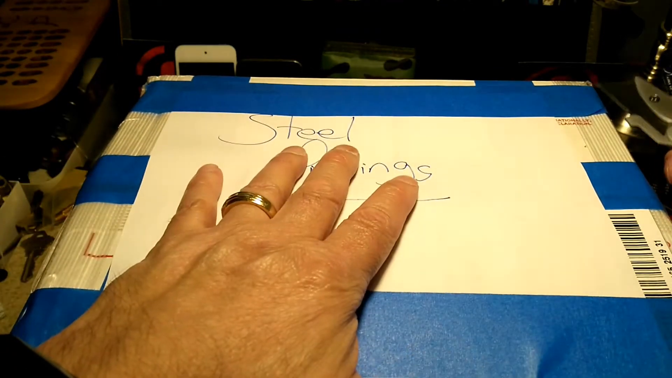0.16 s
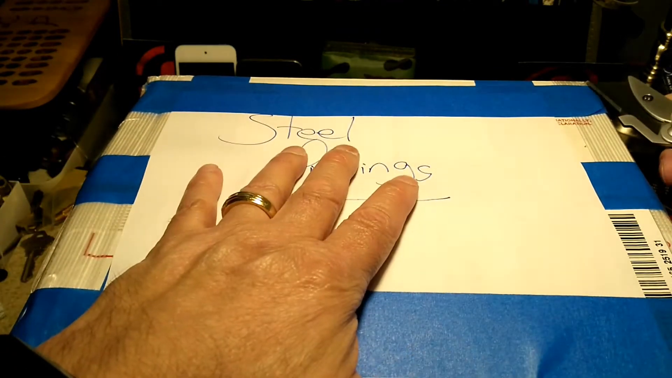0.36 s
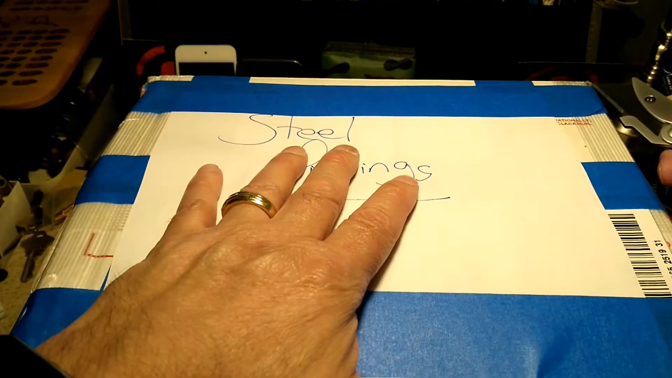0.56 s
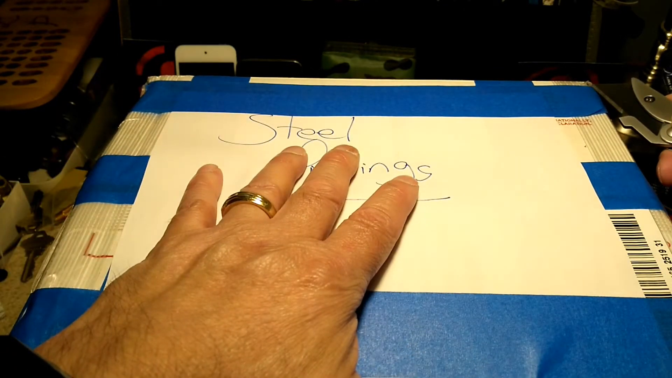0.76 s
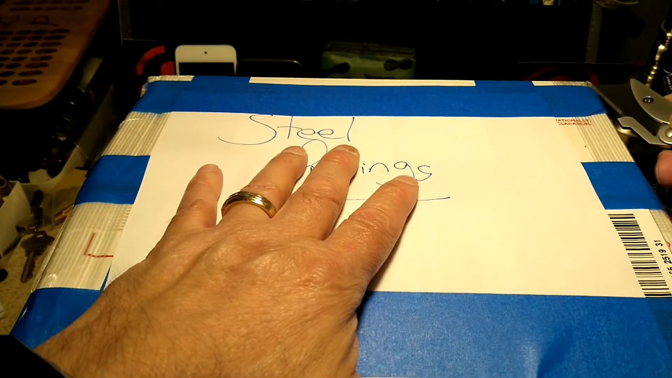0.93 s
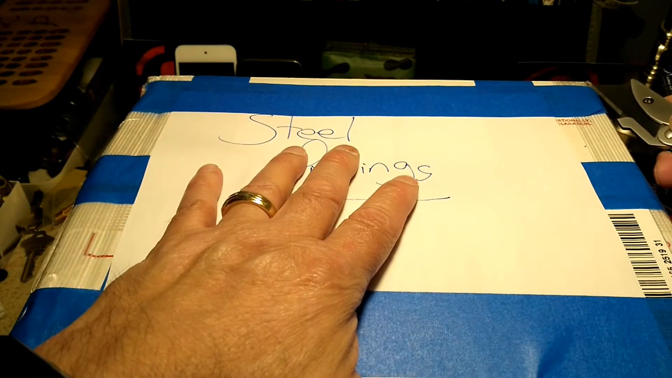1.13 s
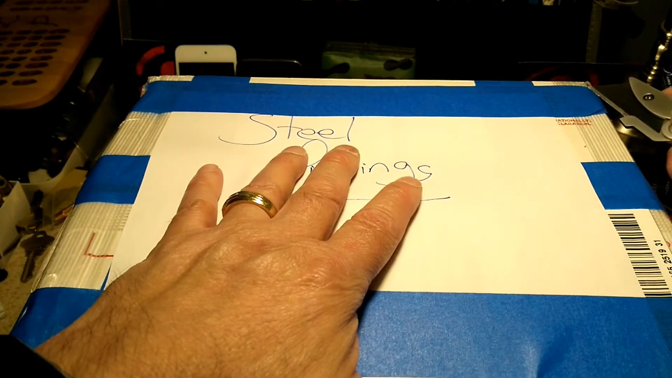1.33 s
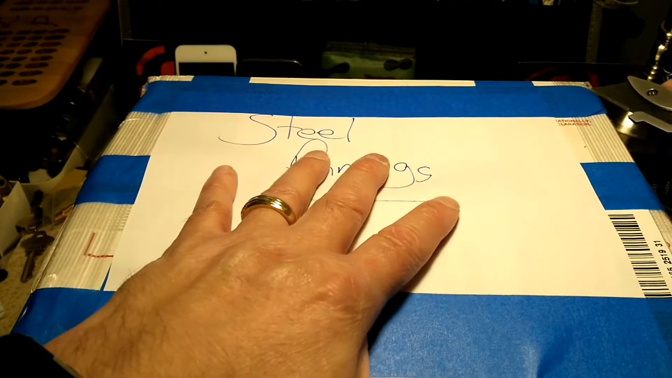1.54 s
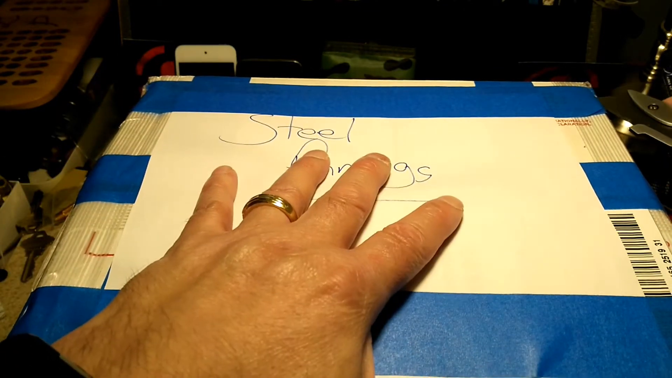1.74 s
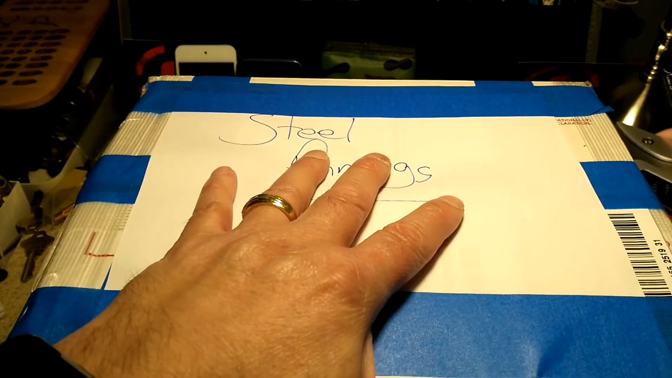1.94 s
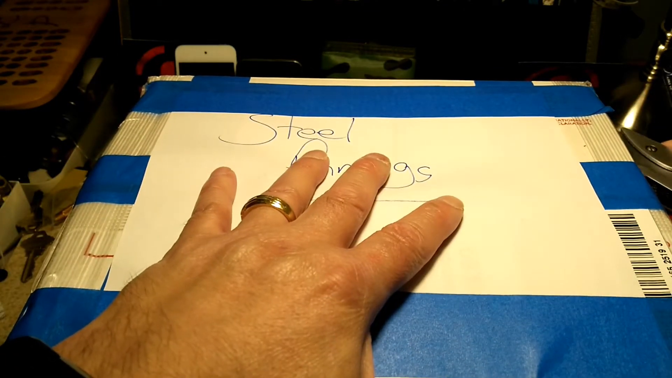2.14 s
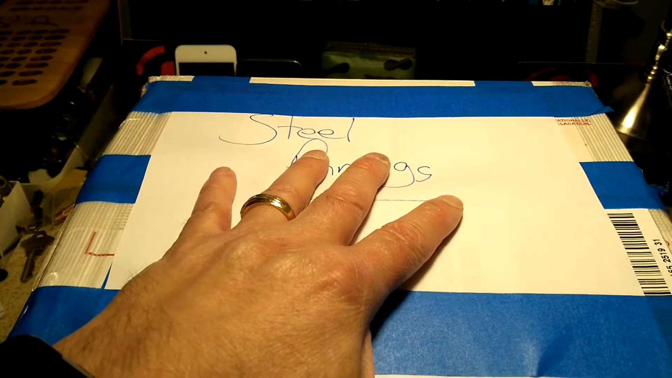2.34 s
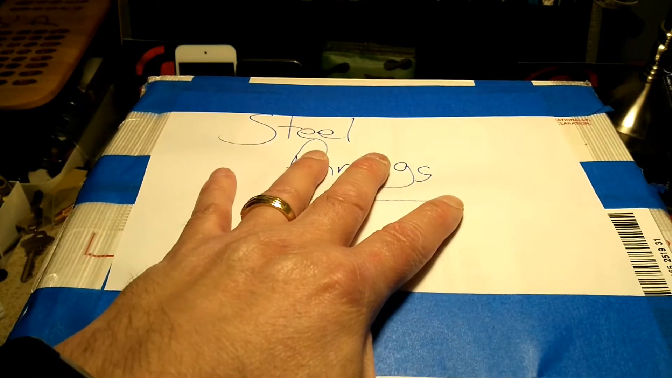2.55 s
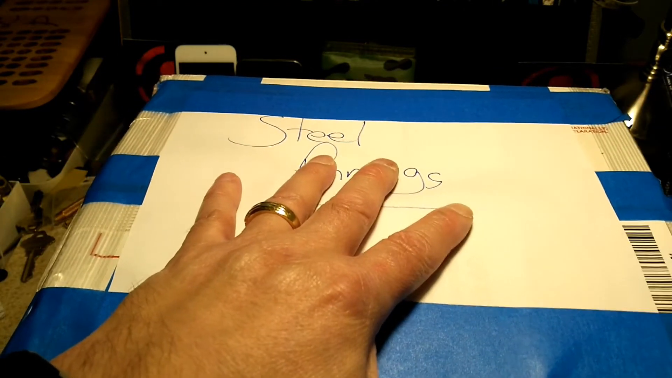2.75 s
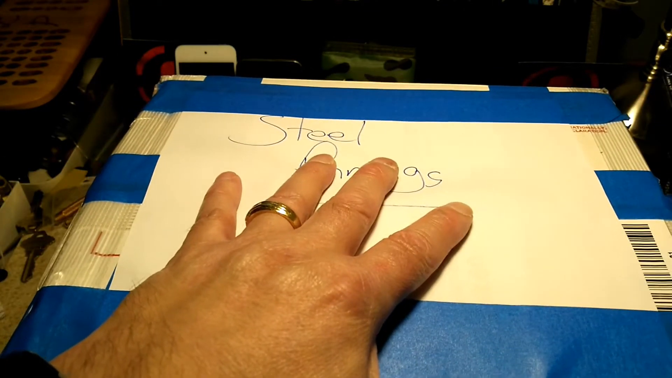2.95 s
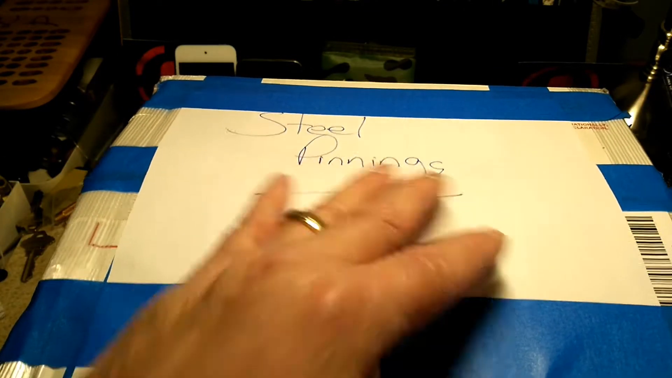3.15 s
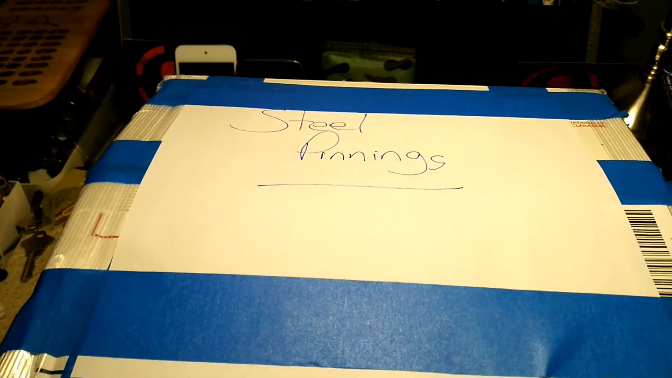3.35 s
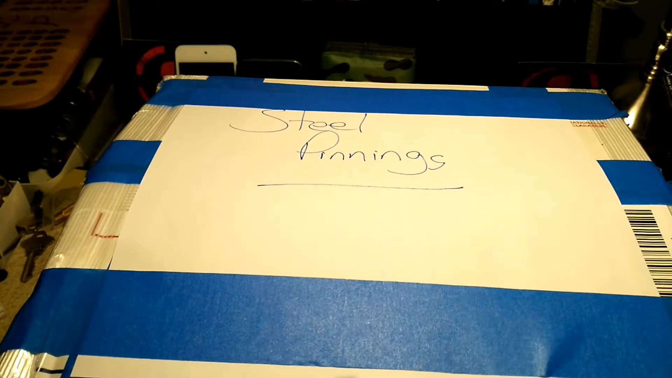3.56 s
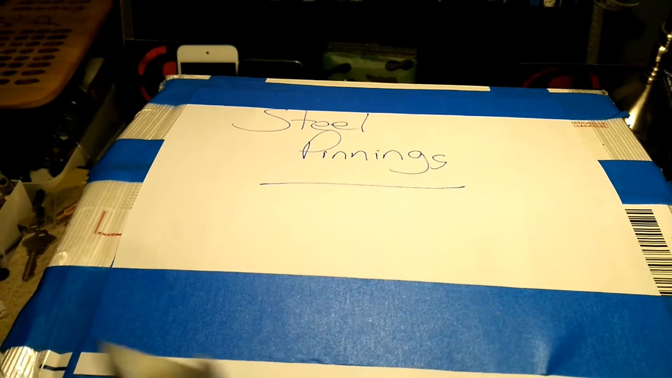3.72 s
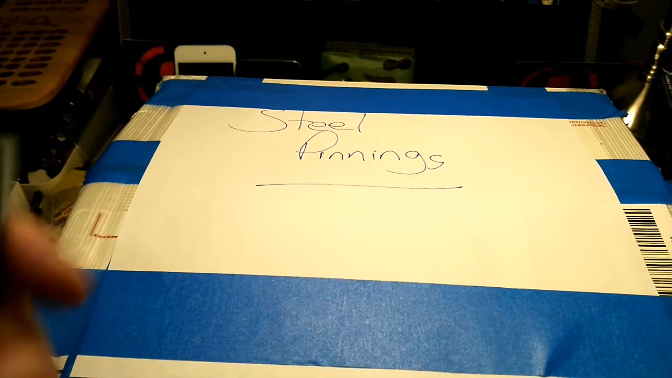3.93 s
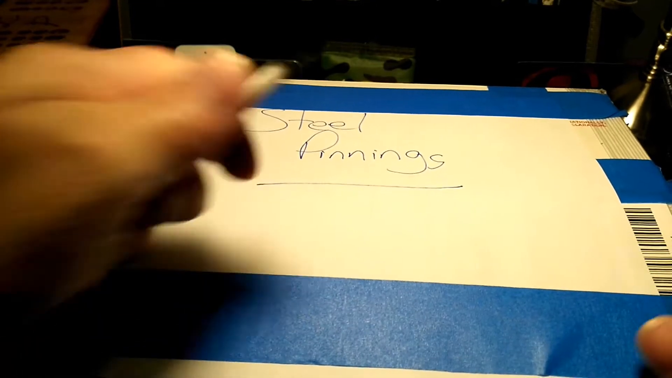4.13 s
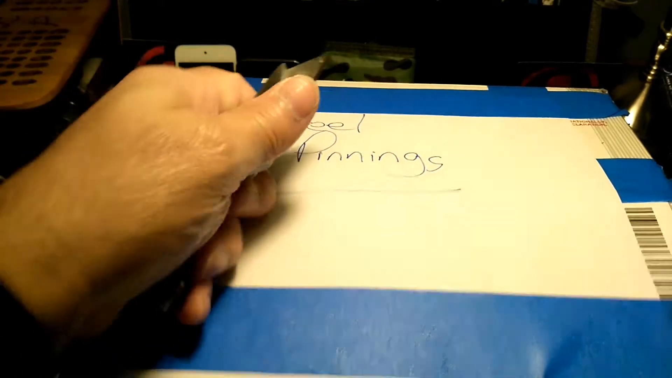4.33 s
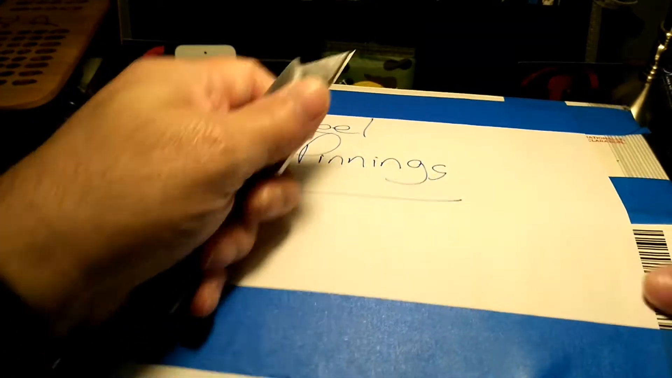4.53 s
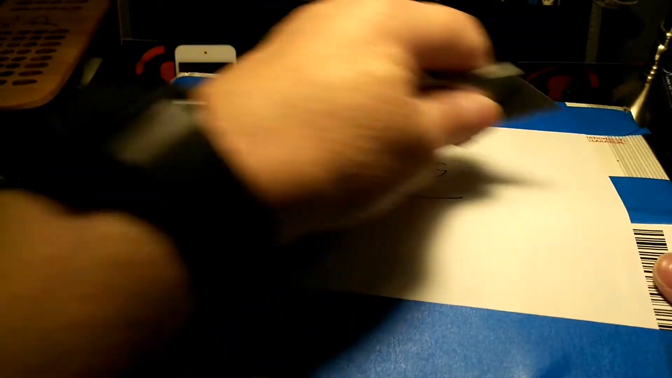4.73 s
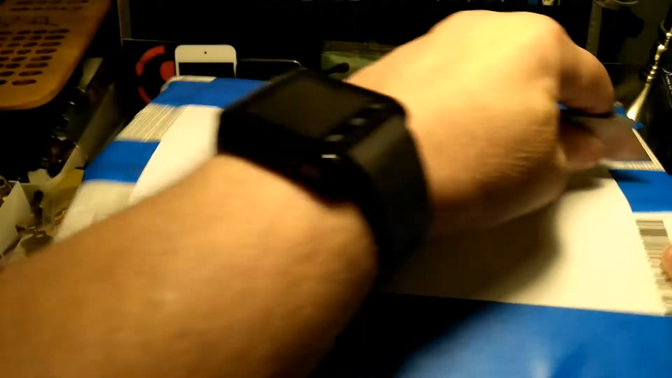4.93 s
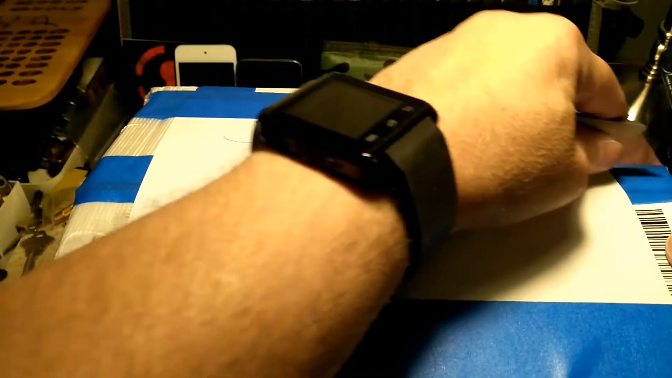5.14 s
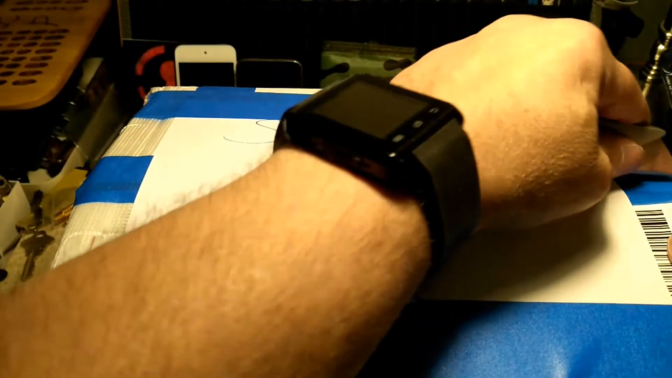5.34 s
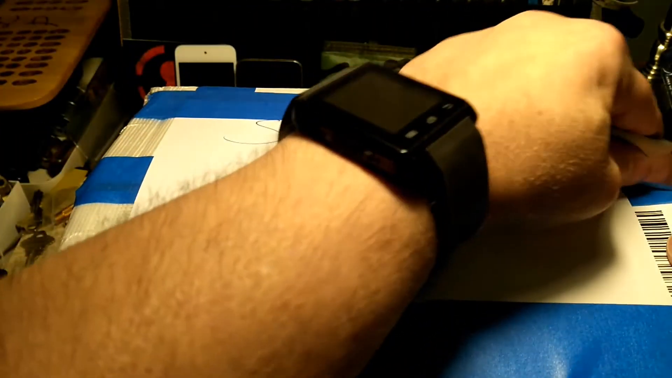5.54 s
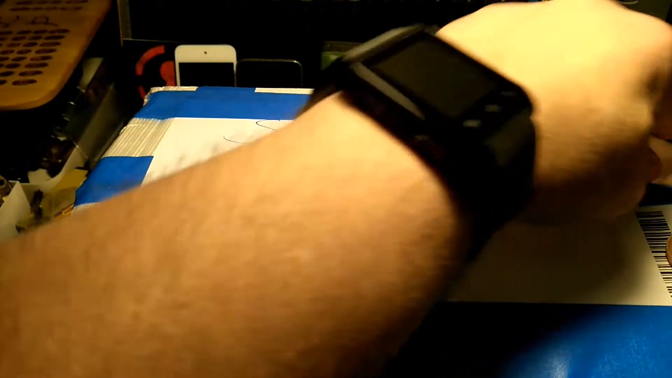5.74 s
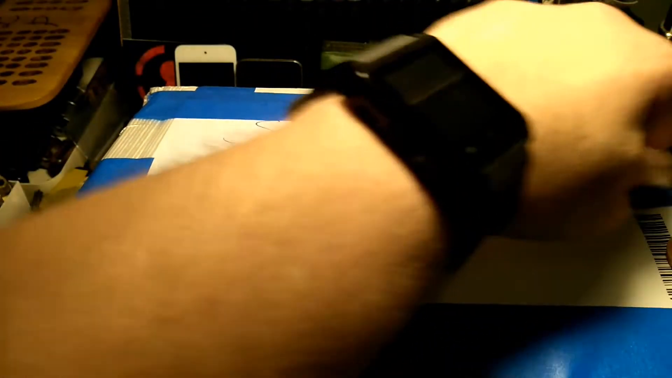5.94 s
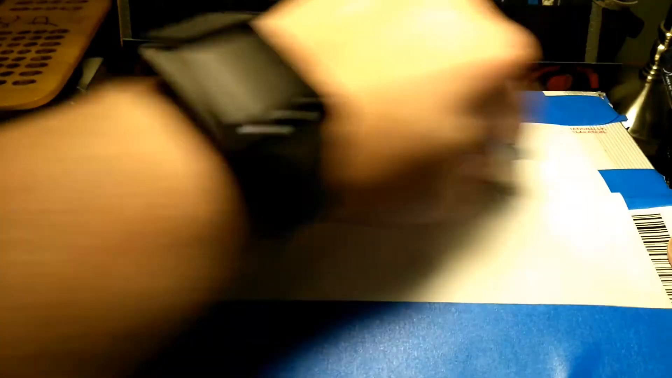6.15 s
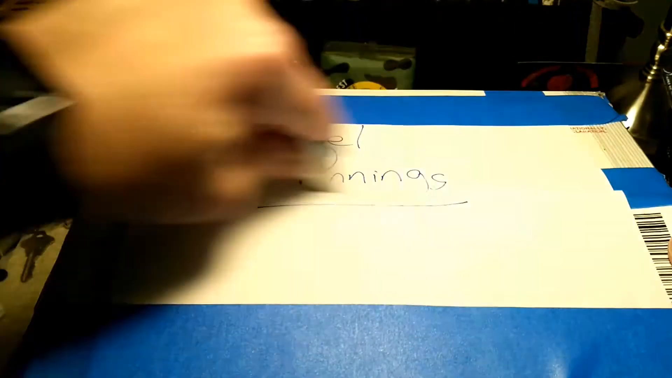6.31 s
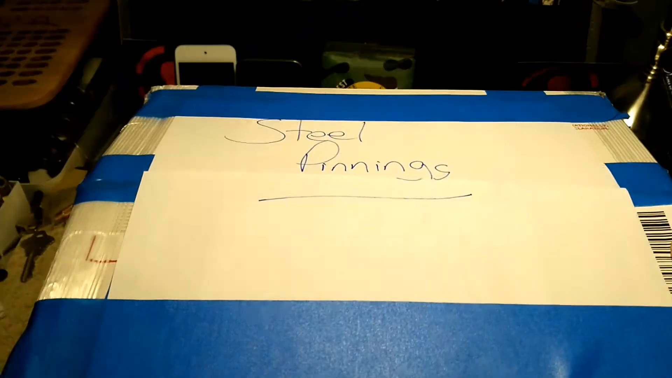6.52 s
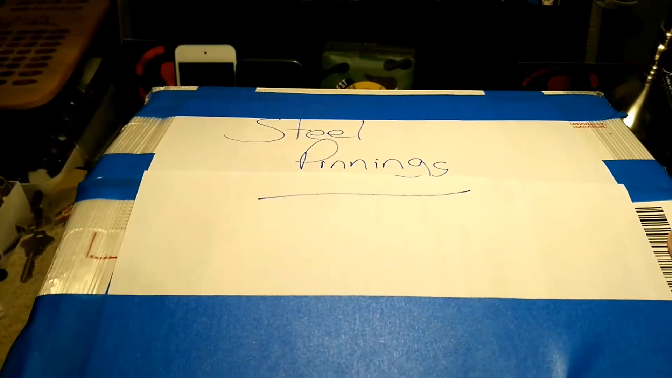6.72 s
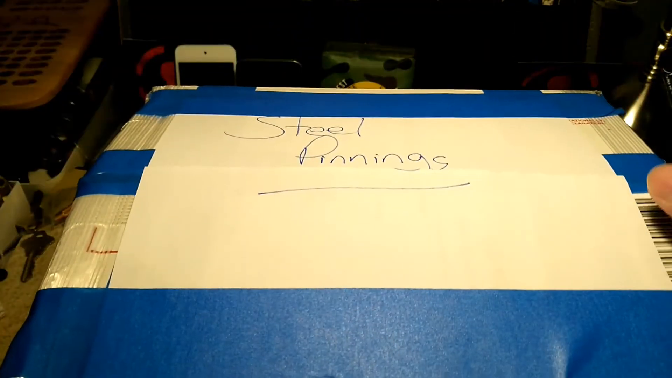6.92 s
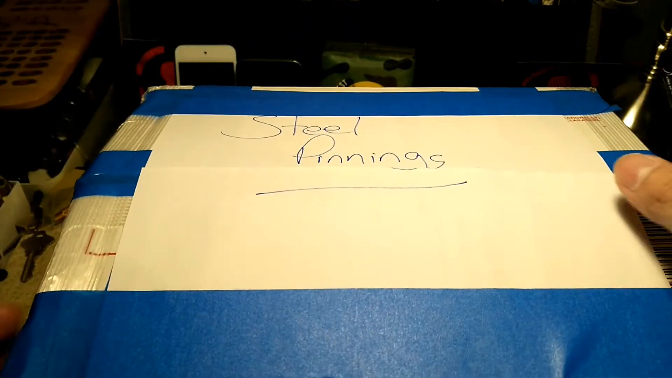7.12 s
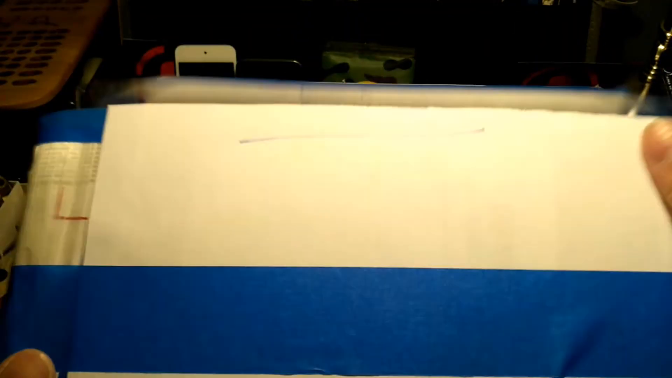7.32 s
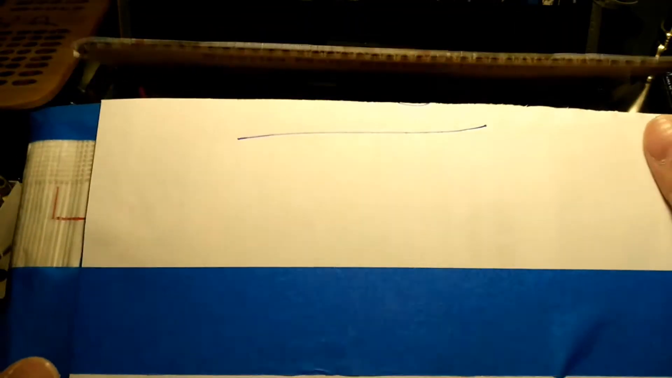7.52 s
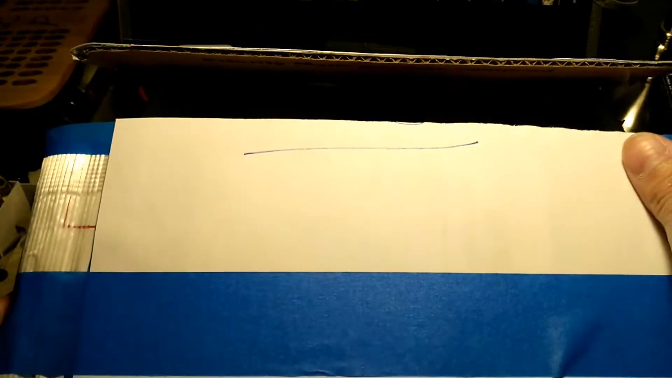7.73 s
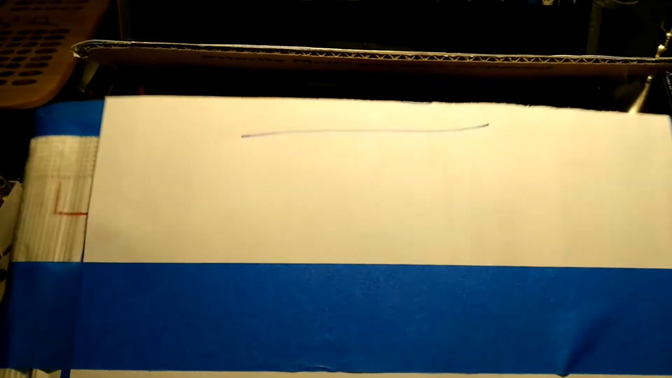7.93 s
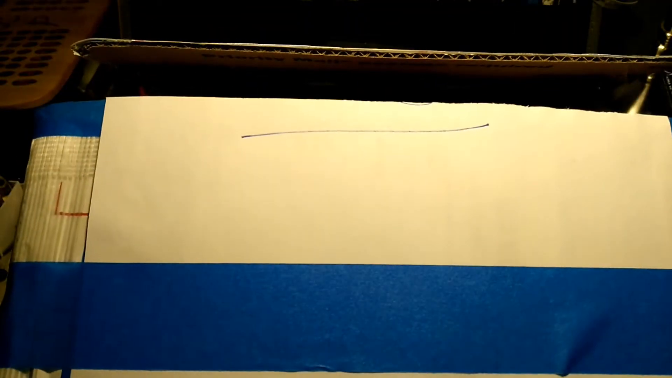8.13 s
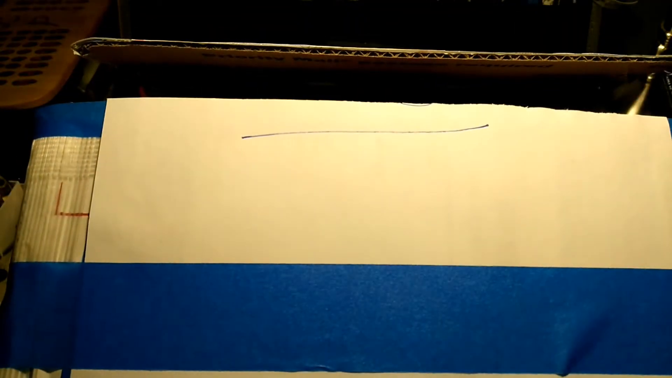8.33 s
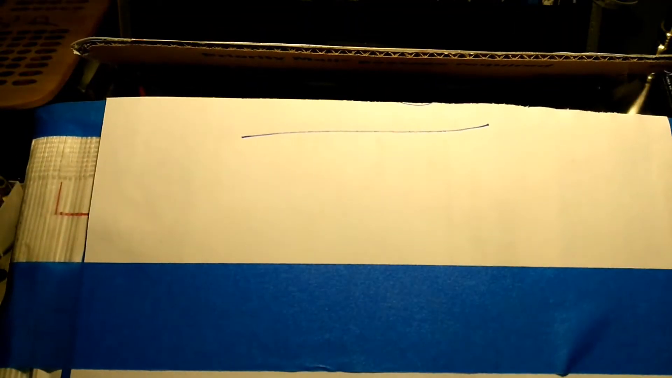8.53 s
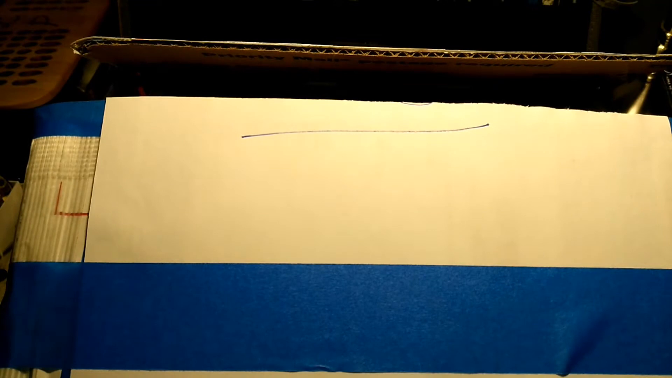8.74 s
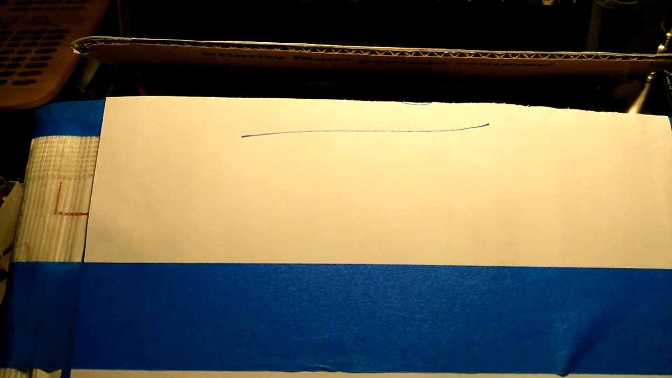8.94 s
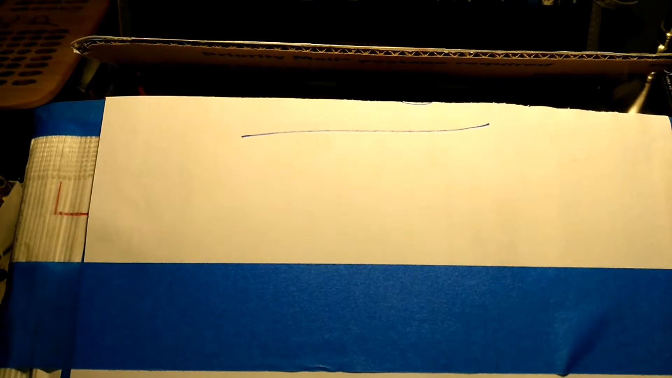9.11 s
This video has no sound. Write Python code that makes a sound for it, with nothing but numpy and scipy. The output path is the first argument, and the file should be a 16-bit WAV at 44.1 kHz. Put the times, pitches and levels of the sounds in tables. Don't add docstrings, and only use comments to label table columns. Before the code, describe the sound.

Close box handling with paper rubs and knocks, a knife click, a harsh half-second tape tear, then a loud lid pop and faint settling.

```python
import sys
import numpy as np
from scipy import signal
from scipy.fft import rfft, irfft, next_fast_len
from scipy.io import wavfile
from scipy.ndimage import uniform_filter1d, map_coordinates

SR = 44100
rng = np.random.default_rng(int(sys.argv[2]) if len(sys.argv) > 2 else 0)


def waveform_to_disk(signal):
    frames = np.transpose(np.atleast_2d(signal))
    scaled = np.clip(frames, -1, 1) * 32767
    samples = np.round(scaled).astype(np.int16)
    wavfile.write(sys.argv[1], SR, samples)


def decibels_to_gain(level_db):
    exponent = np.asarray(level_db, float) / 20
    return 10 ** exponent


N = 404397
TIME = np.arange(N) / SR
SIZE = next_fast_len(N + 4096)
HZ = np.fft.rfftfreq(SIZE, 1 / SR)


def evened(x):
    return x / np.sqrt(np.mean(x ** 2) + 1e-20)


def read(points, hz):
    f, value = np.transpose(points)
    return np.interp(np.log(hz + 1), np.log(f + 1), value)


def level(s, db):
    fade = np.clip((s[-1] - TIME) / .004, 0, 1) * (TIME >= s[0])
    return decibels_to_gain(np.interp(TIME, s, db)) * fade


def swells(rows, rise, fall):
    out = np.zeros((len(rows[0]) - 2, N))
    rises, falls = rise * np.ones(len(rows)), fall * np.ones(len(rows))
    for (start, hold, *db), up, down in zip(rows, rises, falls):
        end = start + abs(hold)
        a, b = (int(np.clip(s * SR, 0, N)) for s in (start - 50 / up, end + 50 / down))
        t = TIME[a:b]
        below = np.maximum(up * (start - t), down * (t - end))
        shape = decibels_to_gain(-np.maximum(below, 0))
        gains = decibels_to_gain(db[0] + np.array([0, *db[1:]]))
        out[:, a:b] += np.outer(gains, shape)
    return out


def add(mix, s, sound):
    part = mix[:, round(s * SR):][:, :sound.shape[1]]
    part += sound[:, :part.shape[1]]


def resonate(x, hz, width):
    r = np.exp(-np.pi * width / SR)
    return 2 * signal.lfilter([1 - r], [1, -r * np.exp(2j * np.pi * hz / SR)], x).real


def band_of(x, hz, width):
    return evened(resonate(resonate(x, hz, width), hz, width))


def rings(x, modes):
    power = sum(decibels_to_gain(2 * db) * 2 * np.pi * width / SR for hz, width, db in modes)
    total = sum((-1) ** k * decibels_to_gain(db) * resonate(x, hz, width) for k, (hz, width, db) in enumerate(modes))
    return total / np.sqrt(power)


def colour(x, spectrum):
    return irfft(rfft(x, SIZE) * evened(decibels_to_gain(read(spectrum, HZ))), SIZE)[..., :N]


def pair(x, same):
    a, b = rfft(x, SIZE)
    c = np.clip(read(same, HZ), -1, 1)
    return irfft(np.array([a, c * a + np.sqrt(1 - c ** 2) * b]), SIZE)[:, :N]


def grit(per_s, spread_db, smooth):
    strength = decibels_to_gain(spread_db * np.minimum(rng.exponential(1, N), 5))
    slips = strength * (rng.random(N) < per_s / SR)
    return evened(smooth + evened(signal.lfilter([1], [1, -.97], slips)))


def patchy(patch_db):
    frames = N // 128 + 4
    a, b, c, d, patch = rng.standard_normal((frames, 129, 5)).T
    patch = uniform_filter1d(patch, size=4, axis=0)
    patch = evened(uniform_filter1d(patch, size=12, axis=1))
    z = np.array([a + 1j * b, c + 1j * d]) * decibels_to_gain(patch_db * patch)
    return evened(signal.istft(z, nperseg=256, noverlap=128)[1][:, :N])


# f/Hz, level/dB per Hz
ROOM_TONE = [(50, -40.5), (85, -33.5), (123, -5), (173, -24), (239, -9), (372, -20.5), (609, -27),
             (1500, -35.5), (1950, -71.5), (3300, -120)]
# f/Hz, level/dB per Hz
AMPLIFIER_HISS = [(880, -26), (1500, -1), (2000, 0), (2600, -3), (3200, -8), (5000, -14), (10000, -16),
                  (16000, -20)]
# f/Hz, width/Hz, level/dB
MOTOR_HUM = [(129.9, 36, -70.5), (242, 10, -69.5), (291, 100, -70.5), (614, 21, -76.5)]
# f/Hz, level/dB
WHINE = [(7381, -98), (14729, -95)]
# start t/s, hold t/s, level/dB
SHAKES = [
    (1.89, 0.0087, -56),
    (2.31, .02, -45),
    (4.28, 0.09, -52.5),
    (6.2, .3, -43),
    (6.97, 0.024, -56),
    (7.25, 0.1, -46.5),
    (7.65, 0.108, -50.5),
    (8.0, 0.55, -59),
]
# f/Hz, likeness
AIR_SAME = [(60, .975), (290, .9), (640, .3), (1400, .01), (15000, .01)]


def air():
    tone = decibels_to_gain(-57 - 6.0) * colour(rng.standard_normal((2, N)), ROOM_TONE)
    hiss = decibels_to_gain(-79) * colour(rng.standard_normal((2, N)), AMPLIFIER_HISS)
    noise = rng.standard_normal((2, N))
    hum = sum(decibels_to_gain(db) * band_of(noise, hz, width) for hz, width, db in MOTOR_HUM)
    lines = sum(decibels_to_gain(db) * np.sin(2 * np.pi * hz * TIME) for hz, db in WHINE)
    rumble = band_of(noise, 54.0, 48.)
    drift = evened(np.interp(TIME, np.arange(40) / 4, rng.standard_normal(40)))
    wander_db = 1.5 * drift
    shake = decibels_to_gain(-58.5 + wander_db) + swells(SHAKES, rise=141.5, fall=139.5)
    steady = decibels_to_gain(wander_db[::-1]) * (tone + hum)
    return pair(steady + shake * rumble, AIR_SAME) + hiss + lines


# t/s, level/dB, centre f/Hz, width/Hz, length t/s
BRUSHES = [(0, -56, 3000, 880, 0.0026), (7.653, -80.5, 2750, 251, 0.21), (1.473, -59, 1620, 199, 0.018),
           (2.831, -66.5, 3230, 1200, 0.052), (2.843, -60, 13500, 2500, 0.036),
           (2.498, -52.5, 836, 300, 0.19), (3.369, -74, 8350, 3000, 0.029),
           (3.608, -55.5, 8950, 3000, 0.0043), (3.692, -77, 9700, 4000, 0.13),
           (3.931, -76.5, 8500, 4170, 0.092), (4.033, -56.5, 1710, 510, 0.015),
           (5.128, -77.5, 7800, 1980, 0.091), (5.236, -72.5, 7850, 2300, 0.058),
           (5.376, -67.5, 8150, 3360, 0.045), (6.721, -70.5, 4000, 1180, 0.021),
           (6.715, -72, 8450, 3000, 0.03), (6.799, -70.5, 9500, 3000, 0.082),
           (5.903, -73.5, 8970, 4000, 0.079), (8.557, -70, 1956, 120, 0.02), (8.59, -75, 1956, 120, .015),
           (8.517, -72, 1320, 150, .01), (8.613, -68, 3260, 900, 0.008), (8.957, -71, 3100, 700, .008),
           (8.668, -65, 1320, 120, 0.02), (8.66, -62.5, 3000, 700, 0.025), (8.993, -64.5, 3000, 700, 0.014),
           (9.011, -65, 2900, 600, .02), (2.425, -40, 213, 45, .05), (4.272, -48, 195, 60, .06),
           (7.3, -41, 200, 60, .06), (7.26, -40, 100, 50, .07)]
# t/s, level/dB, centre f/Hz, width/Hz, length t/s
ROCKS = [(3.24, -61, 765, 45, .05), (3.31, -58, 755, 35, .08), (3.42, -65, 770, 40, .1),
         (3.14, -61, 640, 90, .05), (3.08, -66, 1030, 50, .08), (3.27, -63, 1680, 70, .07),
         (3.35, -63, 1590, 60, .05), (3.57, -64.5, 1960, 45, .14), (3.6, -67, 1700, 80, .05),
         (3.67, -65, 1330, 60, .1), (3.1, -65, 2000, 60, .1), (3.58, -72, 2650, 80, .12)]
# t/s, level/dB, centre f/Hz, width/Hz, length t/s
CATCHES = [(6.005, -41, 300, 120, .03), (6.13, -37, 290, 90, .025), (6.222, -30, 300, 120, .015),
           (6.236, -28, 260, 90, .02), (6.266, -26, 345, 50, .028), (6.305, -29, 320, 120, .018),
           (6.372, -28, 370, 60, .03), (6.395, -30, 330, 80, .015), (6.4, -32, 125, 40, .05),
           (6.465, -31, 130, 40, .032), (6.47, -27, 360, 60, .02), (6.508, -35, 65, 60, .018),
           (6.245, -38, 1180, 80, .03), (6.34, -35, 1000, 500, .015), (6.412, -34, 800, 90, .03),
           (6.425, -36, 1180, 80, .045), (6.462, -29, 900, 150, .02), (6.345, -34, 2430, 250, .015),
           (6.365, -38, 2420, 150, .03), (6.365, -37, 4900, 500, .025), (6.405, -34, 4800, 1300, .04),
           (6.445, -34, 4850, 700, .03), (6.27, -38, 2450, 400, .06)]


def brushes():
    out, rows = np.zeros((2, N)), BRUSHES + CATCHES + ROCKS
    noises = rng.standard_normal((len(rows), 2, 6000))
    for (s, db, hz, width, length), noise in zip(rows, noises):
        u = np.arange(6000) / SR / length
        swell = 3.28 * np.sqrt(u) * np.exp(-(1.31 * u) ** 2)
        add(out, s, decibels_to_gain(db) * band_of(noise, hz, width) * swell)
    return out


# start t/s, hold t/s, paper level/dB, box
# share/dB, fizz share/dB
SLIDES = [(1.44, 0.025, -54, 2.5, 1), (1.58, 0.084, -69, 6, -6.5), (1.76, 0.022, -89, -3, -4),
          (1.855, 0.0083, -48, 6.5, -9), (2.192, 0.045, -46, 9, -9), (2.04, 0.059, -75, 22, -8),
          (2.43, 0.053, -47.5, 4.5, -8), (2.5, 0.18, -52.5, 6.5, -4.5), (2.855, 0.012, -67, -7, 2),
          (3.08, 0.094, -58, 6, -4.5), (3.18, 0.017, -51.5, -0.5, -9.5), (4.15, 0.09, -72, 0, -7),
          (4.288, 0.07, -61, 11, -3), (4.45, 0.075, -60.5, 0, -5), (4.55, 0.055, -61, 1.5, -2),
          (4.728, 0.008, -62, -9, 1), (4.8, 0.14, -70.5, -13, -18), (4.965, 0.04, -65, -6, -6),
          (5.08, 0.37, -73.5, 11, -11),
          (6.638, 0.39, -76.5, 14.5, -0.5),
    (7.081, 0.011, -70.5, 4, -4.5),
    (7.193, 0.043, -59, 9.5, -14),
    (7.548, 0.29, -83, 13.5, 0),
    (7.768, 0.083, -67, 8.5, -3),
    (7.997, 0.24, -82, 2, -1.5),
]
# t/s, fall/dB per s, paper level/dB, box share/dB, fizz share/dB
SLIPS = [(0.135, 500, -66, 7, -3), (0.669, 800, -62, 1, -8.5), (1.284, 721, -80, .3, 12),
         (7.239, 299.5, -36, 0.5, -9), (1.658, 522, -36, -3, -9), (1.889, 380, -30.5, -28, -9),
         (1.913, 434, -55.5, 31.5, -3), (2.28, 617, -40.5, 15, -14), (2.382, 1500, -41, 23, -41),
         (5.964, 597, -31.5, -2, 1.5), (6.521, 158.5, -54, 6, -19), (7.266, 1199, -24, 4.5, -14.5),
         (7.292, 1099.5, -15.5, -11, -12), (7.312, 127, -44.5, 5.5, -9), (7.882, 1200, -50, -7, -11),
         (7.907, 199, -62.5, 13, -10)]
# start t/s, hold t/s, paper level/dB, box share/dB, fizz share/dB
SCRAPES = [
    (2.147, .035, -56, 4, -4),
    (2.334, .016, -44, -3, -1),
    (2.433, .03, -52, 0, -2),
    (4.384, .026, -57, 0, 0),
    (4.695, .025, -67, -9, 8),
    (4.538, .015, -59, 4, -3),
    (4.652, .02, -66, 0, 0),
]
# f/Hz, level/dB per Hz
PAPER = [(290, -35), (500, -7.5), (643, -8), (826, -5), (1280, -8), (3010, -10), (4110, -15), (5500, -30.5),
         (7150, -59.5), (12100, -120)]
# f/Hz, level/dB per Hz
FIZZ = [(2940, -29.5), (5000, -12.5), (6290, -12.5), (9150, -8.5), (11000, -11.5), (14900, -17),
        (16200, -24), (16500, -68)]
# f/Hz, width/Hz, level/dB
BOX = [(129.4, 23, 2), (218, 29, -0.5), (269.5, 20, 2), (355, 43, 5), (398, 150, -5)]


def hands(fibres):
    rub = grit(per_s=230.0, spread_db=2.5, smooth=2.0) * fibres
    slides = swells(SLIDES, rise=495.5, fall=224)
    slip_falls = [row[1] for row in SLIPS]
    slips = swells([(s, 0, *db) for s, fall, *db in SLIPS], rise=8995.5, fall=slip_falls * np.ones(len(SLIPS)))
    scrapes = swells(SCRAPES, rise=6000., fall=1700.)
    paper, body, fizz = (slides + slips + scrapes)[:, None] * rub
    return rings(body, BOX) + colour(paper, PAPER) + colour(fizz, FIZZ)


# t/s, peak level/dB, ring f/Hz, treble level/dB
SNAPS = [(1.447, -30, 1940, -17), (1.659, -25.5, 1440, -22), (1.853, -31, 1280, 0), (1.891, -26, 1270, -2),
         (1.929, -33, 8000, 2), (1.965, -33, 9500, -1), (2.147, -45, 1260, 0), (2.191, -36, 1000, -8),
         (2.196, -40, 8000, 3), (2.205, -42, 11000, 3), (2.2185, -32, 6000, 0), (2.221, -36, 1370, -20),
         (2.282, -26, 1260, -14), (2.316, -36, 10000, -8), (2.38, -34, 800, -19), (2.42, -28.5, 704, -20),
         (2.896, -43.5, 1260, -16), (3.076, -41, 7900, -6), (3.419, -41.5, 9300, -6),
         (3.747, -36.5, 1540, -7),
         (4.281, -43, 2180, 7), (4.292, -48, 7500, -6), (4.3, -46, 9000, 0), (4.308, -50, 9500, 0),
         (4.499, -48, 3000, -8), (4.729, -42, 7650, -8), (4.384, -36, 4240, -4), (4.404, -30, 3120, -4),
         (4.54, -45, 1050, -7), (4.725, -34, 7500, -26), (4.974, -40.5, 1150, 2), (5.648, -52, 9050, -3),
         (5.958, -33, 1680, 0), (5.965, -11, 1670, 0), (5.978, -23, 1730, 0), (6.099, -9.5, 7800, -10),
         (6.1, -24.5, 1630, -10.5), (6.118, -22, 1710, -4), (6.086, -26, 1650, -2), (6.177, -20, 5200, -8),
         (6.311, -18, 1000, -12), (6.48, -16, 900, -20), (6.496, -22, 1100, -8), (6.2165, -7, 3330, -14),
         (6.224, -16.5, 2202, -7), (6.233, -12.5, 2300, -5), (6.35, -18, 2430, -12),
         (6.93, -46.5, 8370, 9.5), (7.078, -43.5, 4090, 4.5), (7.25, -24, 2080, 5),
       (7.267, -16.5, 1000, -13.5), (7.292, -11.5, 1170, -22), (7.807, -36, 4550, -4),
       (7.883, -38, 3900, -1), (7.912, -52, 1263, 0), (8.018, -67, 9000, 1), (8.147, -59, 9000, 7),
       (8.661, -49, 1500, -20), (8.993, -59.5, 3230, -5)]


def snaps():
    out, t = np.zeros((2, N)), np.arange(1500) / SR
    high = signal.butter(3, 5500, "high", fs=SR, output="sos")
    mid = signal.butter(2, [700., 5000.], "band", fs=SR, output="sos")
    rows = SNAPS
    spray = decibels_to_gain(-60 * t / .012)
    noises = rng.standard_normal((len(rows), 2, len(t)))
    for (s, db, hz, treble_db), noise in zip(rows, noises):
        burst = 4 * signal.unit_impulse(len(t), 8) + noise * spray
        ring = resonate(resonate(burst, hz, 0.5 * hz), hz, 0.5 * hz)
        crack = ring / abs(ring).max() + 0.56 * signal.sosfilt(mid, burst)
        treble = signal.sosfilt(high, burst)
        add(out, s, decibels_to_gain(db) * (crack / abs(crack).max() + decibels_to_gain(treble_db) * treble / abs(treble).max()))
    return out


# t/s, peak level/dB, pitch f/Hz
THUDS = [(1.66, -36, 218), (1.892, -26.5, 291), (1.921, -16.5, 277), (2.28, -26.5, 264), (2.318, -21, 355),
         (2.403, -35, 230), (2.38, -24, 264), (2.416, -24.5, 210), (2.894, -46.5, 633), (4.269, -45, 182),
         (4.353, -30.5, 353), (4.531, -48.5, 190), (4.973, -49, 640), (4.98, -45, 137), (5.963, -37.5, 369),
         (6.497, -18.5, 355), (7.239, -30, 264), (7.253, -22, 268.5), (7.269, -17, 242), (7.29, -9.5, 358),
         (7.31, -25, 135), (7.883, -39, 440)]


def thuds():
    out, t = np.zeros((2, N)), np.arange(8000) / SR
    push = np.pad(signal.windows.hann(40), (0, len(t) - 40))
    whole = rings(push, BOX)
    for s, db, hz in THUDS:
        turns = hz * t + 0.69 * (1 - np.exp(-t / 0.00028))
        panel = np.sin(2 * np.pi * turns) * decibels_to_gain(-60 * hz * t / 14)
        onset = np.minimum(0.48 * hz * t / 0.11, 1)
        sound = panel * onset + 0.54 * whole / abs(whole).max()
        add(out, s + 0.0012, decibels_to_gain(db) * np.tile(sound / abs(sound).max(), (2, 1)))
    return out


# start t/s, hold t/s, level/dB
DRAG = [
    (3.04, 0.1, -51),
    (3.18, 0.18, -48),
    (3.4, 0.1, -53),
    (3.62, .14, -55.5),
]
# f/Hz, width/Hz, level/dB
TOOL = [(755, 40, -6), (1320, 65, 0), (1670, 75, -4.5), (1990, 45, 0), (2440, 100, -5), (2650, 66, 0)]


def tool():
    slide = swells(DRAG, rise=170, fall=170) * rng.standard_normal((2, N))
    desk = signal.cheby2(4, 30, [330., 3150.], "band", fs=SR, output="sos")
    return signal.sosfilt(desk, rings(slide, TOOL) + decibels_to_gain(-1.0) * slide)


# t/s, pressure level/dB, speed level/dB, tape ring f/Hz
CUT = [
    (5.966, -31.5, -31.5, 3700),
    (6.0, -34, -43, 3100),
    (6.064, -37, -41, 3520),
    (6.108, -25, -38, 2900),
    (6.212, -25, -33.5, 3320),
    (6.308, -22, -34, 2440),
    (6.436, -24, -29.5, 4550),
    (6.498, -23, -38, 3900),
    (6.516, -40, -56, 3300),
]
# f/Hz, width/Hz, level/dB
CUT_BOX = [(129.4, 35, -3), (225, 45, -1), (280, 50, -2), (355, 50, 4), (398, 150, -5)]
# f/Hz, level/dB per Hz
BOARD = [(290, -40.5), (500, -14.5), (565, -6), (795, 4), (1090, -3), (1160, 0.5), (1900, -6), (2470, -41),
         (4180, -120)]
# f/Hz, level/dB per Hz
TEAR = [(1000, -39), (1700, -14.5), (2390, 0.5), (2850, -7.5), (4790, -3), (5500, -6), (7150, -14.5),
        (12100, -120)]


def blade(fibres):
    board = grit(per_s=300., spread_db=3, smooth=.9) * fibres
    tape = grit(per_s=600, spread_db=3.2, smooth=1.1) * fibres
    s, pressure, speed, ring_hz = np.transpose(CUT)
    tear = level(s, speed) * tape
    turn = np.exp(2j * np.pi * np.cumsum(np.interp(TIME, s, ring_hz)) / SR)
    ring = 2 * (turn * signal.lfilter([.06], [1, -.94], tear / turn)).real
    press_share = 0.27
    rip = level(s, -5.5 + press_share * pressure + (1 - press_share) * speed) * board
    body = level(s, pressure) * board
    fizz = level(s, 2.5 + 1.294 * speed) * tape
    low = rings(body, CUT_BOX) + colour(rip, BOARD)
    return low + 0.79 * colour(tear, TEAR) + 2.2 * ring + colour(fizz, FIZZ)


# f/Hz, t/s
ROOM = [(100, 0.22), (500, 0.19), (2000, 0.16), (8000, 0.18), (16000, 0.18)]
# f/Hz, likeness
NEAR_SAME = [(400, .965), (750, .82), (1300, .72), (2000, .65), (3000, .55), (5000, .4), (8000, .1)]


def room(x):
    taps = np.zeros((2, SR // 2))
    slots = np.arange(200, SR // 2 - 20, 20)[None]
    at = slots + rng.integers(0, 20, (2, (SR // 2 - 201) // 20))
    np.put_along_axis(taps, at, rng.choice([-1., 1.], at.shape), 1)
    hz, t, z = signal.stft(taps, SR, nperseg=256)
    decay = decibels_to_gain(-60 * t / read(ROOM, hz)[:, None])
    tail = signal.istft(z * decay, SR, nperseg=256)[1]
    echoes = signal.fftconvolve(x, tail / np.linalg.norm(tail[0]), axes=1)[:, :N]
    return pair(echoes, NEAR_SAME)


# t/s, lead/samples
LEAD = [(0, 10.5), (6.0, 6), (6.2, 3), (6.35, 4.3), (6.5, -4), (7.2, 0.5), (8.0, -5.5), (9.2, -1)]
# f/Hz, level/dB
PORTS = [(100, .2), (300, 1), (1000, 1.5), (2500, 1), (4500, -2.5), (6000, 1), (8000, 7.5), (12000, 6)]


def scene():
    fibres = patchy(patch_db=2.5)
    sounds = brushes() + hands(fibres) + snaps() + thuds() + tool() + blade(fibres)
    near = pair(sounds, NEAR_SAME)
    lead = np.interp(TIME, *np.transpose(LEAD)) / 2
    near = [map_coordinates(x, [np.arange(N) + side * lead], order=3) for x, side in zip(near, (1, -1))]
    tilt = decibels_to_gain(np.outer([.5, -.5], read(PORTS, HZ)))
    heard = irfft(rfft(near + decibels_to_gain(-11.5) * room(sounds), SIZE) * tilt, SIZE)[:, :N]
    air_balance = decibels_to_gain(np.array([[.5], [-.5]]) * 1.5)
    return heard + air() * air_balance


def roll_off(x):
    return signal.sosfilt(signal.butter(12, 16820, fs=SR, output="sos"), x)


def record(dry):
    bass_cut = signal.butter(4, 43., "high", fs=SR, output="sos")
    top_cut = signal.ellip(8, .5, 40, 15900, fs=SR, output="sos")
    return roll_off(signal.sosfilt(np.vstack([bass_cut, top_cut]), dry))


dry = scene()
out = record(dry)
waveform_to_disk(out)
```